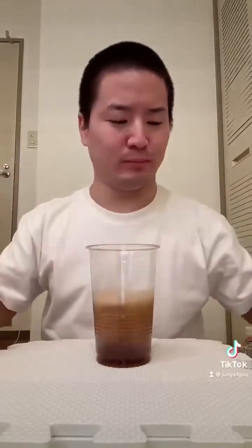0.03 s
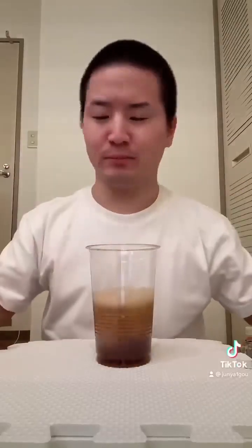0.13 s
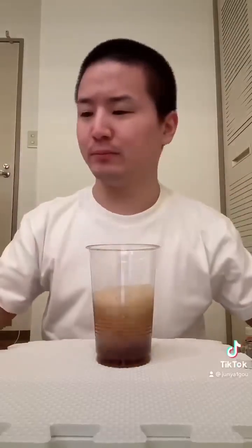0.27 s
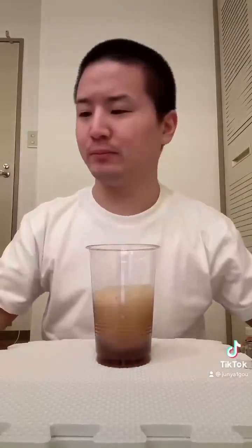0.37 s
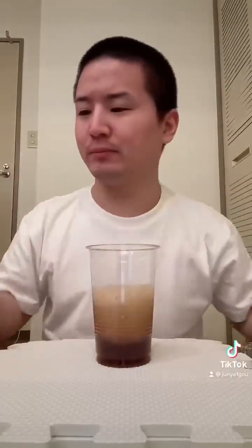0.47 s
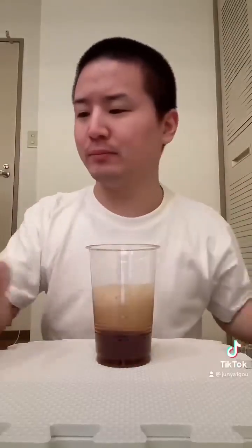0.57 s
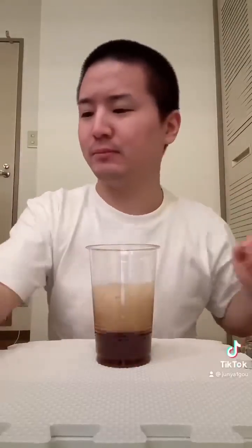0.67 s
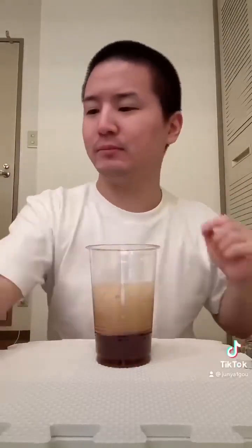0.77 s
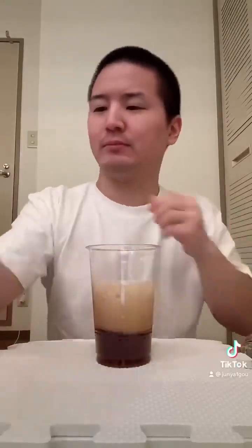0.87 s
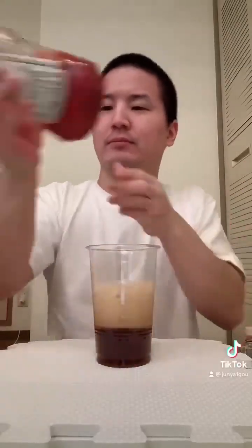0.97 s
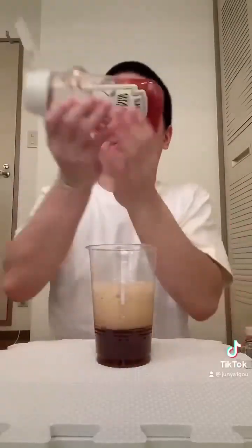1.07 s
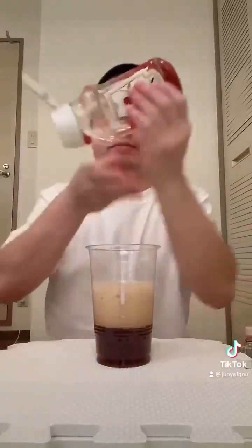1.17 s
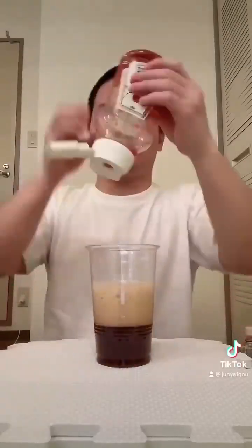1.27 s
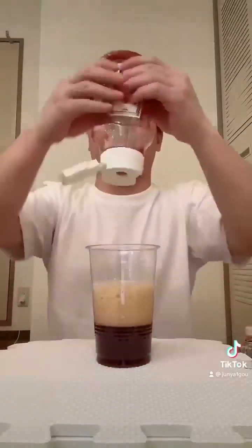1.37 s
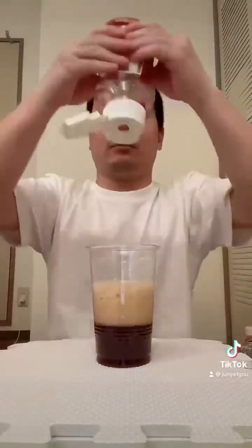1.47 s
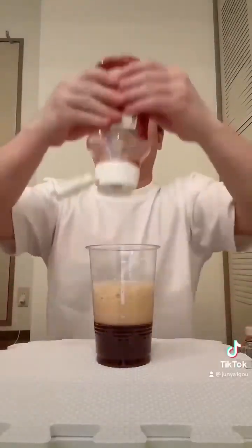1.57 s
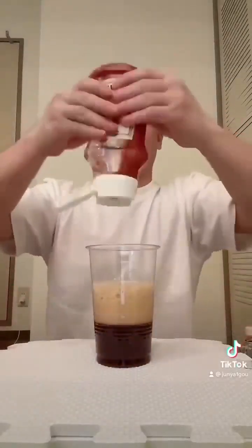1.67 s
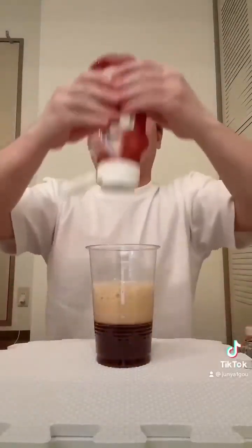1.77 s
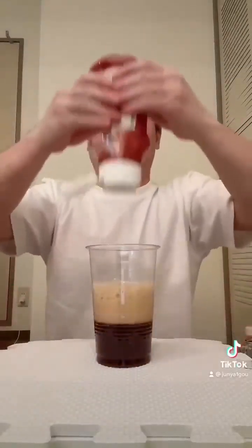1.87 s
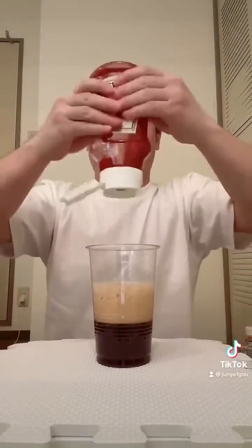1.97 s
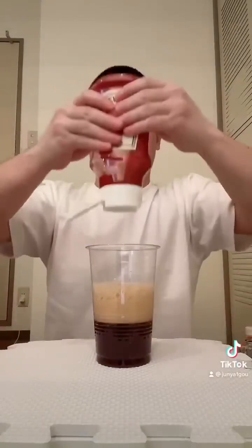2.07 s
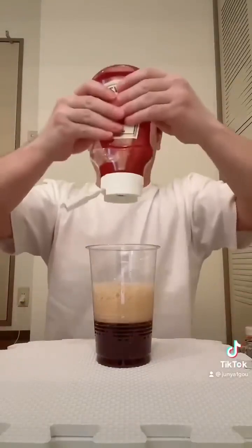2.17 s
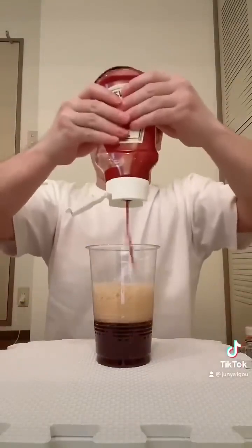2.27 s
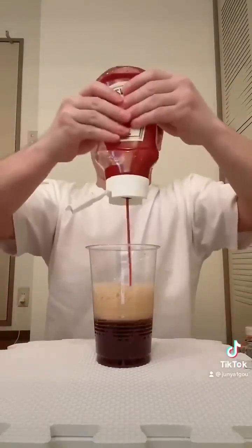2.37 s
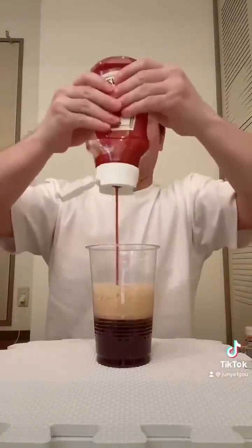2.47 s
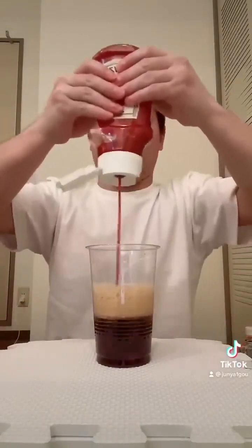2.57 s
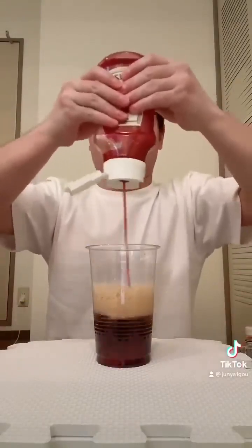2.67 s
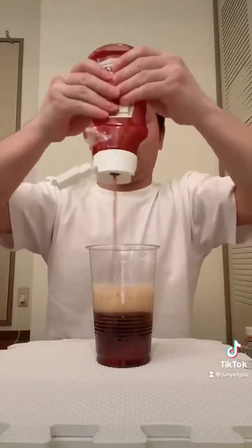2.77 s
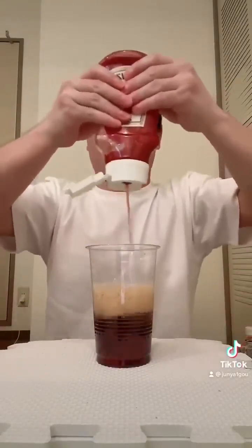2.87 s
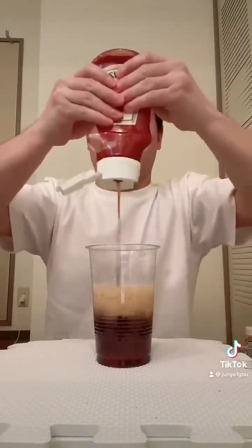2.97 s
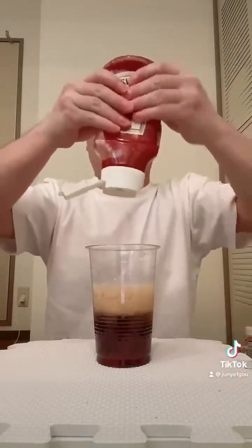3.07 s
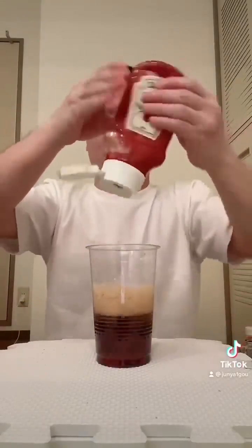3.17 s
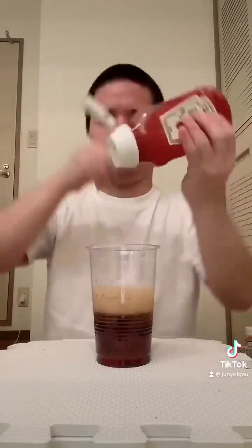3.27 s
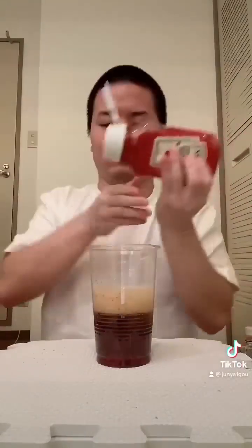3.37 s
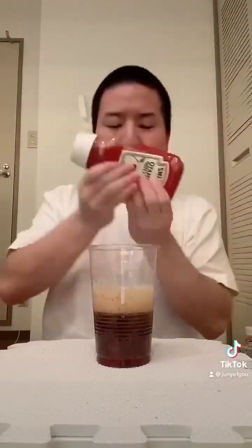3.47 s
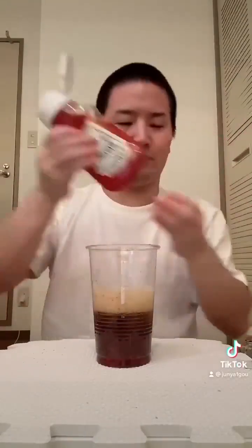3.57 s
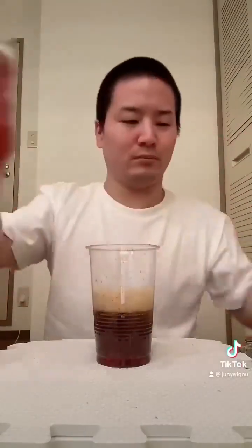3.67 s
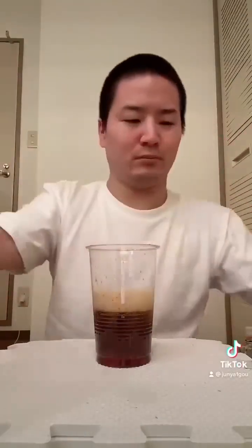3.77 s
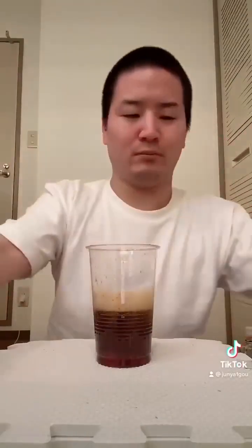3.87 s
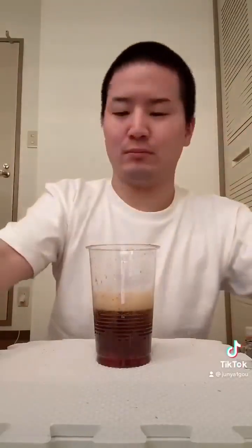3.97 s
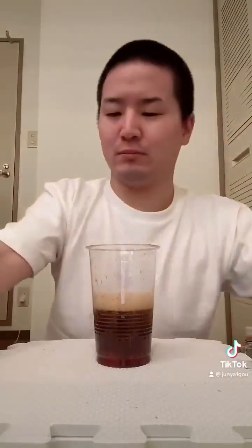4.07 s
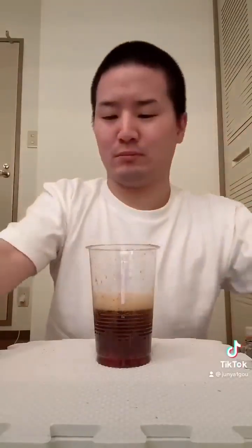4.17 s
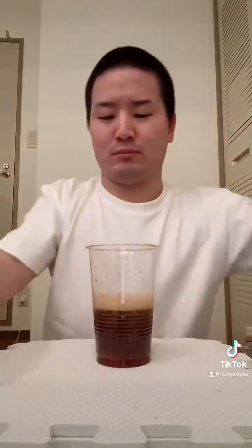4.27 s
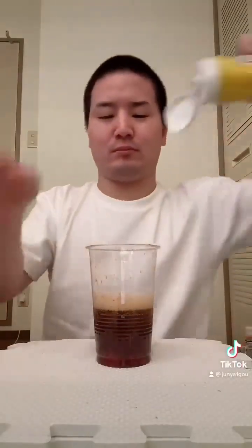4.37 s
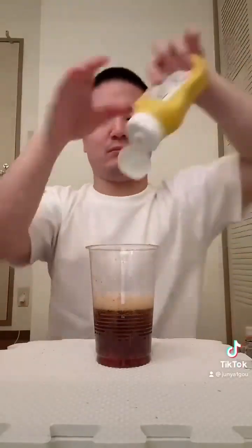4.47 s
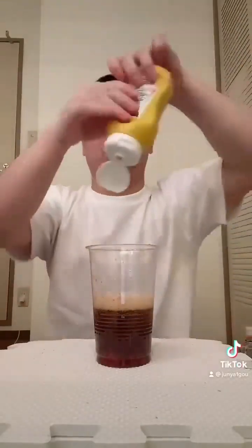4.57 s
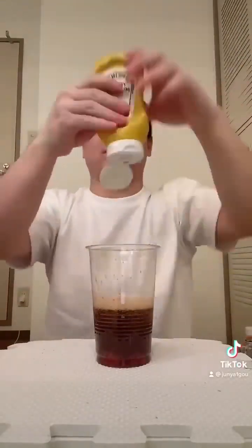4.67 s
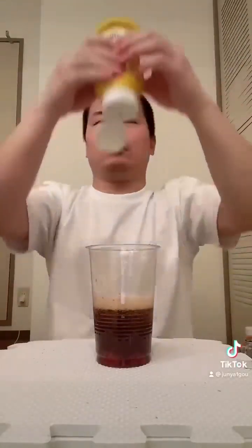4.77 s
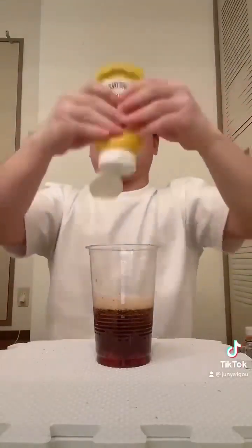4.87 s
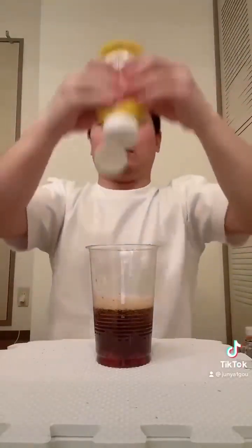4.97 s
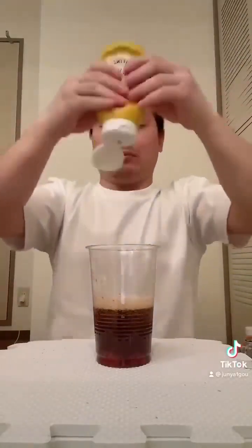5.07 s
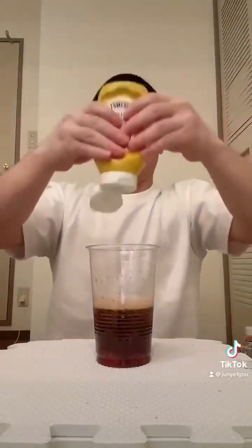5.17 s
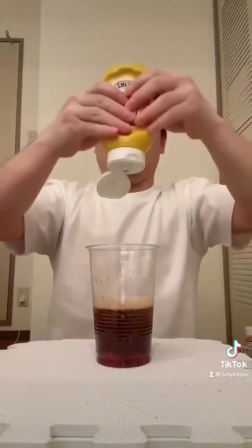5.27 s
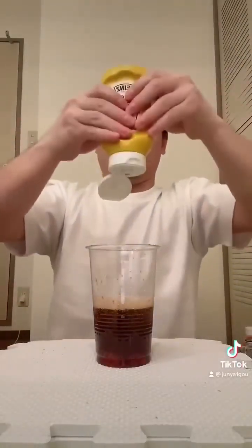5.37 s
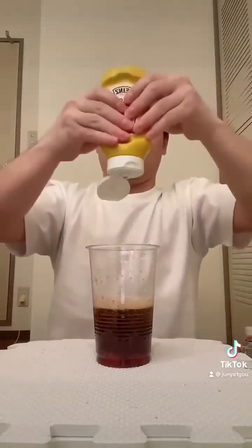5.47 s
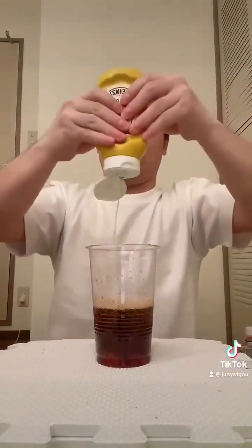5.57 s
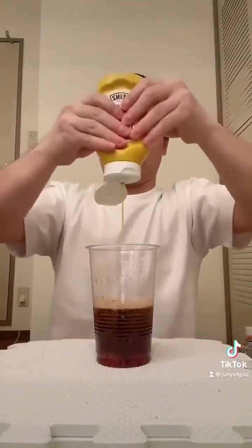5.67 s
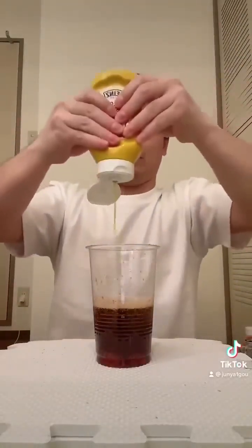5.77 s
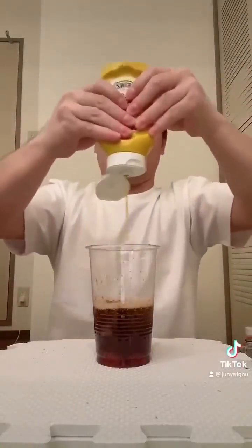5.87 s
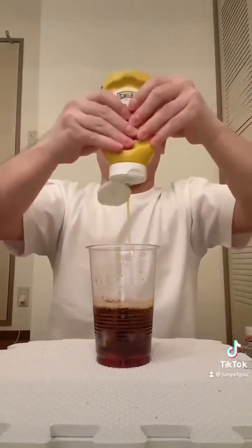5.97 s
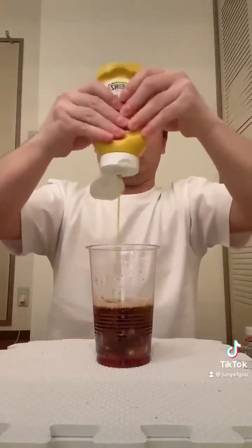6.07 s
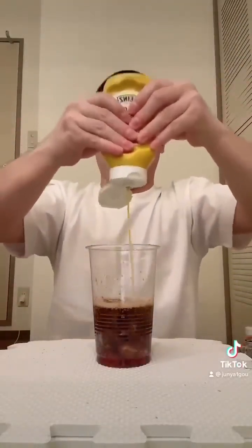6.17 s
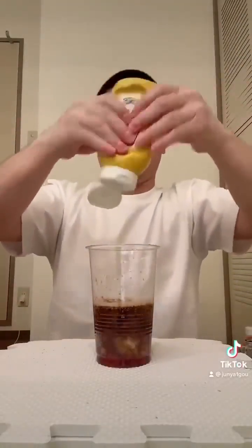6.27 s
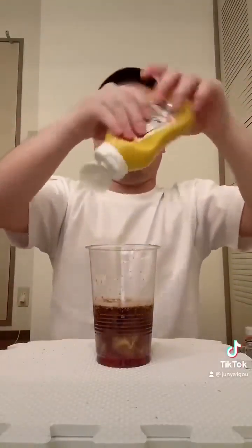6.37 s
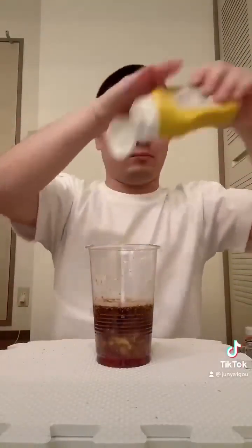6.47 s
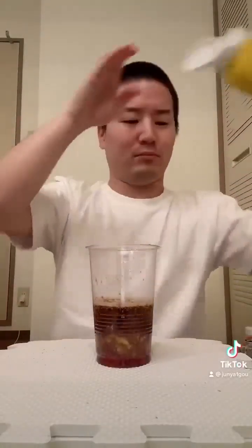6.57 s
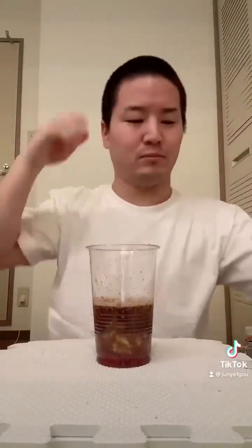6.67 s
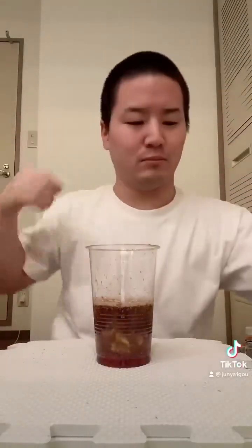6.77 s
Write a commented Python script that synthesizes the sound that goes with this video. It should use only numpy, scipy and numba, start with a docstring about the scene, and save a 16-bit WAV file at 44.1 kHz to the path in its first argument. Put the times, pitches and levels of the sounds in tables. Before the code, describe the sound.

A hard table knock, sputtering ketchup squirts, a bottle clacking down and rattling still, then a rude mustard blast thinning to spits over fizz.

```python
"""Two plastic sauce bottles are squeezed into a cup of fizzing soda on a table in a small room.
Each nozzle sputters as a stream of tiny pops over hiss, filtered by the sauce pocket and the cap;
the second bottle thins to single spits, made of noise puffs, and short hisses are bands of noise.
Bottles knock on the table as ringing modes with a plastic rattle, and the first one rocks to rest.
The fizz is a dense scatter of clicks over hiss, with two foam notes, a low rumble and airy noise."""
import sys
import numpy as np
from scipy import signal
from scipy.fft import rfft, irfft, next_fast_len
from scipy.io import wavfile
from scipy.ndimage import map_coordinates
from numba import njit

SR = 44100
rng = np.random.default_rng(int(sys.argv[2]) if len(sys.argv) > 2 else 0)


def waveform_to_disk(signal):
    """Save audio, clipped to [-1, 1], as 16-bit WAV at the path in sys.argv[1]."""
    frames = np.transpose(np.atleast_2d(signal))
    scaled = np.clip(frames, -1, 1) * 32767
    samples = np.round(scaled).astype(np.int16)
    wavfile.write(sys.argv[1], SR, samples)


N = 300321

# FIZZ AND ROOM: spectra before each layer is set to its own level: (frequency [Hz], density [dB per Hz])
FIZZ_SPECTRUM = [(1060, -25.5), (1800, -7), (2320, -8.5), (3770, -5), (4640, -5.5), (5160, -4), (6890, -5),
                 (7400, -6), (9110, -8), (10100, -12.5), (13100, -13), (15500, -18)]
RUMBLE_SPECTRUM = [(20, -33), (45, -21), (65, -21.5), (85, 4), (120, -5.5), (170, -9), (250, -22),
                   (500, -56.5)]
AIR_SPECTRUM = [(120, -28.5), (250, -6.5), (380, 2), (520, -1.5), (700, -3), (1050, -8), (1600, -12.5),
                (2400, -24.5), (5000, -29)]
# the foam and the air above it resonate, each note swelling once:
# (frequency [Hz], half-width at about -6 dB [Hz], resting level [dB],
#  peak time [s], rise [s], fall [s], swell [dB])
FOAM_NOTES = [(1260, 280, -65.5, 4.03, 1.1, 0.75, 14), (1790, 190, -69.5, 3.12, 2.4, 1.0, 13)]
# resting level [dB], then one swell: (peak time [s], rise [s], fall [s], gain [dB])
# the fizz slowly swells, then sinks at the end; rumble and air swell too
FIZZ_DB, FIZZ_SWELL = -60, (5.95, 3.5, 1.02, 10.1)
RUMBLE_DB, RUMBLE_SWELL = -60, (4.54, 1.42, 9.1, 10.8)
AIR_DB, AIR_SWELL = -62.5, (5.2, 2.6, 6, 11.25)
# the treble of the fizz, above FINE_HZ, has a late swell of its own; level against the rest of the fizz
FINE_HZ, FINE_DB, FINE_SWELL = 8000, -1.5, (6.06, .9, 1.0, 6.7)
# decay of the room's tail: (frequency [Hz], t60 [s])
ROOM_DECAY = [(150, 0.28), (350, 0.32), (1000, 0.2), (3000, 0.25), (10000, 0.17)]
TOP_HZ = 15850  # nothing passes above this

# blows on the table, before a common trim: (time [s], body level [dB],
#  softness: loss in each higher register [dB], thump against the body [dB])
KNOCKS = [(0.165, -5, 10.5, -10), (0.18, -17, 20, 1), (0.239, -22, 6.5, 7.5), (0.247, -21.5, 10, 13),
          (0.283, -35, 11, 12), (0.682, -39, 3.5, -5), (0.707, -38, 5, -1.5), (1.065, -47, .8, -1),
          (1.097, -41.5, 4.5, 0), (1.127, -50.5, 2, 7), (1.376, -49.5, 2, 1), (3.108, -39.5, 5, -8),
          (3.453, -45, 6, 3.5), (3.486, -39.5, 10, 4), (3.977, -27, 10.3, -5), (6.264, -40, 8, -16),
          (6.361, -40, 5, -9), (6.431, -35.5, 3, -7)]
# the full bottle is put down hard, before a trim: (time [s], reference level [dB],
#  then thump, body, clack and tick against it [dB])
LANDING = [(3.909, 2.25, -15, -14.5, -11, -19)]
# ringing modes, before random strength, detuning and damping: (frequency [Hz], level [dB], t60 [s])
TABLE_MODES = [(123, -3, .057), (183, -0.5, .067), (312, -3.5, 0.063), (369, 1, .07), (449, 2.5, .07),
               (521, -.5, .074), (610, -3.5, 0.046), (785, 3.5, .055), (860, -14, .022), (960, -22.5, .069),
               (1050, -5.5, .034), (1430, -9.5, .04), (1700, -4.5, 0.046), (1998, 3, .052),
               (2330, -18.5, .071), (3360, -44.5, .03)]
BOTTLE_MODES = [(157, -2.5, 0.13), (261, 5, 0.057), (335, 7, 0.065), (438, 2, 0.075), (653, 0, 0.052),
                (796, -3.5, 0.097), (1350, -13.5, 0.12), (1426, -18.5, 0.36), (1740, 3.5, 0.053),
                (1900, 3, 0.033), (2015, 3, 0.037), (2545, -1, 0.034), (2730, -13, 0.078),
                (3470, -29, 0.076), (3730, -8, 0.025), (4190, -7, 0.018)]
# registers of a knock, thump to tick: (low edge [Hz], high edge [Hz])
KNOCK_BANDS = [(80, 300), (300, 1100), (1100, 3000), (3000, 15000)]
# the weight of the landing bottle gives the table one low push: scale [dB], time constant [s]
PUSH_DB, PUSH_S = -27, .003

# the upturned bottle is shaken, the valve clicks and the sauce slumps; clicks are before the puff trim:
# (time [s], click level [dB], plop level [dB], plop delay [s], plop pitch [ratio])
SHAKES = [(1.659, -37.5, -17, 0.0021, 1.5), (4.687, -29.5, -26, 0.0023, 0.95),
          (4.999, -26.5, -2, .011, 1.017)]
# sauce slumping into the neck, before the plop's pitch and level: (frequency [Hz], level [dB], t60 [s])
PLOP_MODES = [(407, -18.5, 0.041), (531, -17.5, 0.034), (693, -24, 0.056), (946, -16.5, 0.013),
              (1220, -35, 0.025), (1670, -33, 0.036)]
# register balance of the click against its level: (gurgle [dB], rasp [dB], spray [dB])
CLICK_BALANCE = (-8, -9.5, 0.5)
# the wet slap that comes with a plop, against its level: (gurgle [dB], rasp [dB], spray [dB])
SPLAT_BALANCE = (-25, -28, -34)

# sputtering squeezes: (start [s], hold [s], gurgle level [dB], rasp level [dB], spray level [dB],
#  sag [dB/s], further sag of gurgle and rasp [dB/s], pops [per s])
SQUEEZES = [(2.239, .072, -26.5, -25.5, -24.5, 9, 25, 377),
            (2.576, 0.4135, -34.5, -28.3, -22.5, 3.5, -2.5, 390),
            (5.495, 0.073, -12, -11.5, -22, 135, 17, 900), (5.575, .65, -34.5, -28, -40, 21.5, 49, 640)]
# lumps of sauce reach the valve and make the jet wetter:
# (peak time [s], rise [s], fall [s], gain of the gurgle [dB])
LUMPS = [(2.272, .025, .016, 4), (2.742, .045, .135, 14), (2.95, .022, .045, 8.5)]
LUMP_RASP_SHARE = 0.73  # the rasp follows the gurgle in part
LUMP_POPS_PER_DB = 0.3  # the film bursts faster: fraction of the pop rate added per dB
# gurgle, rasp and spray registers of a nozzle: (low edge [Hz], high edge [Hz])
NOZZLE_BANDS = [(300, 1500), (1500, 4500), (4500, 16500)]
# spray colour of the short ketchup squeeze, the long one and the mustard, before the registers are
# balanced: (frequency [Hz], density [dB per Hz])
KETCHUP_SHORT_SPRAY = [(180, -80), (300, -33), (652, -5), (808, -11.5), (1050, -2), (1330, -10),
                       (1810, -10), (2140, -13), (3020, -5.5), (3750, -19.5), (4960, -21), (10800, -34.5),
                       (15500, -35)]
KETCHUP_SPRAY = [(88, -62), (150, 2.5), (296, -16), (490, -3), (695, -4), (1240, -1.5), (1570, -10.5),
                 (2270, -10), (2650, -6.5), (4060, -10), (6350, -9.5), (11400, -21.5), (15500, -16)]
MUSTARD_SPRAY = [(180, -60), (300, -36.5), (696, -12.5), (922, -7), (1280, -6.5), (1560, -15),
                 (1840, -11.5), (2250, -16), (2930, -13), (4490, -22), (6360, -11.5), (8010, -16.5),
                 (15500, -21)]
# cavity resonances of each bottle and cap: (frequency [Hz], width [Hz], lift [dB])
KETCHUP_CAP = [(930, 39, 7), (1030, 23, 4.5), (1220, 150, 4.5), (1890, 270, 4), (2660, 72, -4),
               (2664, 203, 7), (3015, 55, 6), (3220, 27, 1.5), (3420, 21, 9), (4340, 370, -4.5),
               (4250, 49, 3), (4430, 260, 6.5), (6330, 420, 5.5), (7530, 380, 5), (7720, 250, -3.5),
               (8800, 220, 9)]
MUSTARD_CAP = [(937, 38, 3.8), (1080, 23, 0.5), (1260, 96, 6), (1750, 240, 3.3), (2990, 220, 2.9),
               (5000, 340, 8.3), (6330, 1440, 6.9), (7530, 240, 10.5), (8000, 250, 1), (9100, 1900, 9.9)]
# the pocket of sauce at the valve rings higher as it empties:
# (full pitch [Hz], empty pitch [Hz], half-empty time [s], emptying time [s], lift [dB])
SHORT_POCKET = (650, 4300, 2.291, .009, 10)
LONG_POCKET = (1220, 1260, 8, 3, -20)
MUSTARD_POCKET = (893, 6260, 5.767, 0.06, 1.8)
ATTACK_S, RELEASE_DB_PER_S = 0.0012, 720  # the valve snaps open and closes more slowly
OPENING_DB, OPENING_S = 1, 0.0047  # the stored pressure overshoots as the valve opens, then decays
SPRAY_LEAD_S = .012  # fine spray needs the most pressure and stops this much sooner

# short hisses of air through the valve, from narrow to broad noise:
# (time [s], length [s], frequency [Hz], half-width at about -6 dB [Hz], level [dB])
VALVE_HISSES = [(2.384, 0.057, 8200, 900, -51), (5.477, 0.03, 8800, 1510, -39),
                (5.674, 0.038, 12300, 3010, -39), (6.076, .06, 11300, 4500, -40.5),
                (6.238, 0.052, 6940, 6950, -43), (6.233, 0.062, 3020, 600, -45)]

# the bottle rolls on its rim after landing, and its note sinks; level before the soft filter
ROLL_START_S, ROLL_LENGTH_S, ROLL_HZ, ROLL_SINK_OCTAVES_PER_S, ROLL_DB = 3.95, .3, 394, 6.4, -40.5
# it tips from edge to edge: first tap, basic gap, each gap over the last, unevenness of the two edges
ROCK_START_S, ROCK_GAP_S, ROCK_SHRINK, ROCK_LIMP = 4.128, .091, .954, .05
ROCK_DB, ROCK_FADE_DB = -27, 6.5  # first taps before the soft filter, and the loss by the last one

# single bubbles burst in the mustard nozzle, before the puff trim:
# (time [s], spray level [dB], extra gurgle of the sauce carried along [dB])
SPITS = [(5.589, -20, 8), (5.605, -23, 0), (5.623, -25.5, -1), (5.641, -20.5, 0), (5.659, -21, 3),
         (5.676, -21.5, 1), (5.7, -18.5, -7), (5.725, -15.5, -2), (5.75, -20, -13), (5.777, -20.5, -11),
         (5.823, -18, 0.5), (5.848, -20, -0.5), (5.89, -21.5, 0), (5.926, -19, 0.5), (5.981, -24, -7),
         (6.026, -34, 0), (6.244, -37, 2)]
# a spit dries as the pocket empties; balance against the spray: (gurgle [dB], rasp [dB])
WET_SPIT_BALANCE = (8, 9.5)
DRY_SPIT_BALANCE = (-18, -11)


def amp(db):
    """Decibels to gain."""
    return 10 ** (np.asarray(db) / 20)


def unit(x):
    """Scaled to rms 1."""
    return x / np.sqrt(np.mean(x ** 2) + 1e-20)


def along(points, hz):
    """(frequency, value) points read on a log-frequency axis."""
    f, v = np.transpose(points)
    return np.interp(np.log(hz + 1), np.log(f + 1), v)


def add(track, s, sound):
    """Mixes a sound into the track at time s."""
    part = track[max(round(s * SR), 0):][:len(sound)]
    part += sound[:len(part)]


def swell(t, peak_s, rise_s, fall_s, gain_db):
    """A bell-shaped rise and fall in dB."""
    side_s = np.where(t < peak_s, rise_s, fall_s)
    return gain_db * np.exp(-((t - peak_s) / side_s) ** 2)


def wobble(size, per_s):
    """A smooth random curve with per_s knots a second."""
    knots = rng.standard_normal(int(size * per_s / SR) + 4)
    return map_coordinates(knots, [np.arange(size) * per_s / SR])


def coloured(x, gain_db):
    """x through the causal minimum-phase filter with the given dB-of-frequency law."""
    size = 2 * next_fast_len(len(x) // 2 + 4096)
    cepstrum = irfft(np.log(amp(gain_db(np.fft.rfftfreq(size, 1 / SR))) + 1e-6))
    # folding the cepstrum forward in time makes the filter causal
    cepstrum[1:size // 2] *= 2
    cepstrum[size // 2 + 1:] = 0
    return irfft(rfft(x, size) * np.exp(rfft(cepstrum)))[:len(x)]


def band(x, edges):
    """Causal band-pass."""
    return signal.sosfilt(signal.butter(3, edges, 'bandpass', fs=SR, output='sos'), x)


def resonant_noise(size, hz, width_hz):
    """Noise of rms 1 in one steep-sided resonance."""
    def resonance_db(f):
        return -20 * np.log10(1 + ((f - hz) / width_hz * 1.01) ** 2)
    return unit(coloured(rng.standard_normal(size), resonance_db))


@njit
def resonate(x, omega, sharpness):
    """A resonance of unit gain that follows omega (radians per sample)."""
    out = np.zeros(len(x))
    speed, place = 0.0, 0.0
    for i in range(len(x)):
        g = np.tan(omega[i] / 2)
        v = (speed + g * (x[i] - place)) / (1 + g * (g + 1 / sharpness))
        speed, place = 2 * v - speed, place + 2 * g * v
        out[i] = v / sharpness
    return out


def balanced(x, bands, levels_db):
    """A short sound with each register set to its level over the first 30 ms."""
    parts = [band(x, edges) for edges in bands]
    head = round(.03 * SR)
    return sum(amp(db) * p / np.sqrt(np.mean(p[:head] ** 2)) for p, db in zip(parts, levels_db))


def soda_and_room(bubbles_per_s, spread_db, hiss_db):
    """Countless bubbles burst in the foam, which resonates in two bands; the room adds rumble and air."""
    t = np.arange(N) / SR
    happens = rng.random(N) < bubbles_per_s / SR
    signs = rng.choice([-1, 1], N)
    sizes = amp(spread_db * np.minimum(rng.exponential(size=N), 5))
    bursts = unit(happens * signs * sizes)
    hiss = amp(hiss_db) * rng.standard_normal(N)
    fizz = unit(coloured(bursts + hiss, lambda f: along(FIZZ_SPECTRUM, f)))
    fine = signal.sosfiltfilt(signal.butter(2, FINE_HZ, 'highpass', fs=SR, output='sos'), fizz)
    fizz = fizz - fine + amp(FINE_DB + swell(t, *FINE_SWELL)) * fine
    notes = sum(amp(db + swell(t, *shape)) * resonant_noise(N, hz, width_hz)
                for hz, width_hz, db, *shape in FOAM_NOTES)
    notes = notes * amp(0.89 * wobble(N, 5.2))  # the notes waver in level at random
    rumble = unit(coloured(rng.standard_normal(N), lambda f: along(RUMBLE_SPECTRUM, f)))
    air = unit(coloured(rng.standard_normal(N), lambda f: along(AIR_SPECTRUM, f)))
    fizz = amp(FIZZ_DB + swell(t, *FIZZ_SWELL)) * fizz
    rumble = amp(RUMBLE_DB + swell(t, *RUMBLE_SWELL)) * rumble
    air = amp(AIR_DB + swell(t, *AIR_SWELL)) * air
    return fizz + notes + rumble + air


def blow(modes, levels_db, damping, rattle_db, rattle_t60):
    """One contact: the modes ring, with a crack and a brief dense rattle of plastic."""
    t = np.arange(SR // 3) / SR
    hz, db, t60 = np.transpose(modes)[:, :, None]
    strength_db, detune, phase = rng.standard_normal((3, len(modes), 1))
    decay = amp(db + 1.8 * strength_db - 60 * t * damping / t60)
    ring = np.sum(decay * np.sin(2 * np.pi * hz * (1 + .003 * detune) * t + np.pi * phase), axis=0)
    ring = ring * (1 - np.exp(-t / 0.00064))  # soft onset
    crack = amp(11.5 - 60 * t / 0.003)
    rattle = amp(rattle_db - 60 * t / rattle_t60)
    clatter = rng.standard_normal(len(t)) * (crack + rattle)
    plastic = [(500, 5), (2000, 5), (3800, -4.5), (6000, -16.5), (12000, -27.5)]  # (Hz, dB)
    clatter = coloured(clatter, lambda f: along(plastic, f))
    return balanced(ring + clatter, KNOCK_BANDS, levels_db)


def knocks():
    """Bottles and hands meet the table; soft contacts thump, hard ones clack."""
    out = np.zeros(N)
    for s, body_db, softness_db, thump_db in KNOCKS:
        levels_db = body_db + np.array([thump_db, 0, -softness_db, -2 * softness_db])
        knock = blow(TABLE_MODES, levels_db, damping=1.1, rattle_db=1.3, rattle_t60=0.096)
        add(out, s + .002, amp(-7) * knock)
    for s, level_db, *shares_db in LANDING:
        levels_db = np.add(level_db, shares_db)
        landing = blow(BOTTLE_MODES, levels_db, damping=1.08, rattle_db=-7.0, rattle_t60=0.073)
        add(out, s + 0.0034, amp(-4.5) * landing)
        u = np.arange(SR // 10) / SR / PUSH_S
        add(out, s + 0.0034, amp(PUSH_DB) * u * (2 - u) * np.exp(-u))
    return out


def emptiness(t, pocket):
    """How far the sauce pocket has emptied, from 0 to 1."""
    half_s, emptying_s = pocket[2:4]
    return .5 + .5 * np.tanh((t - half_s) / (2 * emptying_s))


def nozzle(x, start, spray, cap, pocket):
    """Sound leaving the valve: the moving sauce pocket, the fixed cavities, the spray's spectrum."""
    full_hz, empty_hz, *_, lift_db = pocket
    pocket_hz = full_hz * (empty_hz / full_hz) ** emptiness(start + np.arange(len(x)) / SR, pocket)
    x = x + amp(lift_db) * resonate(x, 2 * np.pi * pocket_hz / SR, 7.8)

    def colour_db(f):
        cavities_db = sum(db / (1 + (2 * (f - hz) / width) ** 2) for hz, width, db in cap)
        return along(spray, f) + cavities_db
    return coloured(x, colour_db)


def puff(s, levels_db):
    """A trapped bubble leaves the nozzle in a few milliseconds, with a faint tail."""
    t = np.arange(SR // 25) / SR
    rise = t / .0014
    envelope = rise * np.exp(-rise ** 2 / 2) + amp(-25 - 60 * t / .04)
    noise = envelope * rng.standard_normal(len(t))
    burst = nozzle(noise, s, MUSTARD_SPRAY, MUSTARD_CAP, MUSTARD_POCKET)
    return amp(-13) * balanced(burst, NOZZLE_BANDS, levels_db)


def shakes():
    """The valve clicks, then the sauce slaps against the cap and briefly rings the air in the bottle."""
    out = np.zeros(N)
    t = np.arange(SR // 8) / SR
    for s, click_db, plop_db, delay_s, pitch in SHAKES:
        add(out, s, puff(s, np.add(click_db, CLICK_BALANCE)))
        ring = sum(amp(db - 60 * t / t60) * np.sin(2 * np.pi * (pitch * hz * t + rng.random()))
                   for hz, db, t60 in PLOP_MODES)
        add(out, s + delay_s, amp(plop_db) * ring * (1 - np.exp(-t / 0.00072)))
        add(out, s + delay_s, puff(s, np.add(plop_db, SPLAT_BALANCE)))
    return out


def sputter(squeeze, spray, cap, pocket, flutter_db, hiss_db, scatter_db):
    """The sauce film bursts again and again at uneven intervals, over a hiss of escaping air."""
    start, hold_s, gurgle_db, rasp_db, spray_db, sag, drying, pops_per_s = squeeze
    t = np.arange(0, hold_s + .1, 1 / SR)
    lump_db = sum(swell(start + t, *lump) for lump in LUMPS)
    pressure = (1 - np.exp(-t / ATTACK_S)) * amp(OPENING_DB * np.exp(-t / OPENING_S) - sag * t)
    gurgle_db = gurgle_db + lump_db - drying * t
    rasp_db = rasp_db + LUMP_RASP_SHARE * lump_db - drying * t
    rate = pops_per_s * (1 + LUMP_POPS_PER_DB * lump_db)
    # pops fall due at uneven counts of the running pop rate
    turns = np.cumsum(rng.gamma(2, 1 / 2, 1000))
    sizes = amp(scatter_db * np.clip(rng.standard_normal(len(turns)), -2, 1.4))
    sizes[0] = amp(scatter_db)  # the opening pop has a set size
    at = np.searchsorted(np.cumsum(rate) / SR, turns - turns[0])
    pops = -np.bincount(at, sizes, len(t) + 1)[:len(t)] / np.sqrt(rate)
    hiss = amp(hiss_db) * rng.standard_normal(len(t))
    jet = nozzle(unit(pops) + hiss, start, spray, cap, pocket)
    # the finest spray flutters in level at random
    mist = band(jet, (9500, 16500))
    jet = jet + mist * (amp(2.5 * wobble(len(t), 35)) - 1)
    out = np.zeros(N)
    levels_db = gurgle_db, rasp_db, spray_db
    stops_s = hold_s, hold_s, hold_s - SPRAY_LEAD_S
    for edges, db, stop_s in zip(NOZZLE_BANDS, levels_db, stops_s):
        release = amp(-RELEASE_DB_PER_S * np.maximum(t - stop_s, 0))
        part = band(jet, edges) * amp(flutter_db * wobble(len(t), 60))
        part = part / np.std(part[t < hold_s])
        add(out, start, pressure * release * amp(db) * part)
    return out


def squeezes():
    """A short and a long ketchup squeeze, then a mustard blast that thins to a leak."""
    short, long, blast, leak = SQUEEZES
    first = sputter(short, KETCHUP_SHORT_SPRAY, KETCHUP_CAP, SHORT_POCKET,
                    flutter_db=.8, hiss_db=-5, scatter_db=4)
    second = sputter(long, KETCHUP_SPRAY, KETCHUP_CAP, LONG_POCKET,
                     flutter_db=1.2, hiss_db=-5.5, scatter_db=3.8)
    third = sputter(blast, MUSTARD_SPRAY, MUSTARD_CAP, MUSTARD_POCKET,
                    flutter_db=1.7, hiss_db=0, scatter_db=-0.5)
    fourth = sputter(leak, MUSTARD_SPRAY, MUSTARD_CAP, MUSTARD_POCKET,
                     flutter_db=2, hiss_db=1, scatter_db=3.5)
    return first + second + third + fourth


def valve_hisses():
    """Air slips through the nearly closed valve in short hisses, from narrow to broad noise."""
    out = np.zeros(N)
    for s, length_s, hz, width_hz, db in VALVE_HISSES:
        size = round(length_s * SR)
        add(out, s, amp(db) * signal.windows.tukey(size, .5) * resonant_noise(size, hz, width_hz))
    return out


def rocking(count):
    """The bottle rolls briefly on its rim, then taps ever closer together, the last taps lighter."""
    out = np.zeros(N)
    t = np.arange(0, ROLL_LENGTH_S, 1 / SR)
    omega = 2 * np.pi * ROLL_HZ * 2 ** (-ROLL_SINK_OCTAVES_PER_S * t) / SR
    roll = resonate(rng.standard_normal(len(t)), omega, 1.7)
    roll = unit(resonate(roll, omega, 1.7))
    roll_db = ROLL_DB - 19.5 + swell(t, .105, .14, 0.14, gain_db=19.5)
    add(out, ROLL_START_S, amp(roll_db) * roll)
    s = ROCK_START_S
    for k in range(count):
        db = ROCK_DB - ROCK_FADE_DB * (k / (count - 1)) ** 5
        levels_db = db + np.array([-42, -14.5, -21.0, -26.5])
        add(out, s, blow(TABLE_MODES, levels_db, damping=0.73, rattle_db=0.0, rattle_t60=0.078))
        s += ROCK_GAP_S * ROCK_SHRINK ** k * (1 + ROCK_LIMP * (-1) ** k)
    soft = [(300, -1), (430, -1), (780, -5.5), (1500, -6.5)]  # (Hz, dB)
    return coloured(out, lambda f: along(soft, f))


def spits():
    """Single puffs, wet and low at first, dry and bright once the pocket is empty."""
    out = np.zeros(N)
    for s, db, sauce_db in SPITS:
        dryness = emptiness(s, MUSTARD_POCKET)
        balance = (1 - dryness) * np.array(WET_SPIT_BALANCE) + dryness * np.array(DRY_SPIT_BALANCE)
        gurgle_db, rasp_db = balance
        add(out, s, puff(s, [db + gurgle_db + sauce_db, db + rasp_db, db]))
    return out


def room(x, early_db, tail_db):
    """The direct sound, a few echoes off table and near walls, and a tail that keeps its bass longest."""
    hz, t, z = signal.stft(rng.standard_normal(SR // 2), SR, nperseg=256)
    decay = amp(-60 * t / along(ROOM_DECAY, hz)[:, None])
    tail = signal.istft(z * decay, SR, nperseg=256)[1]
    response = amp(tail_db) * tail / np.linalg.norm(tail)
    for delay_s, db in [(.0021, -10), (.0058, -0.5), (.0097, -7.5), (.0165, -3)]:
        response[round(delay_s * SR)] += amp(early_db + db)
    return x + signal.fftconvolve(x, response)[:N]


def scene():
    """Table sounds and nozzle sounds in the room, over the fizz."""
    table = room(knocks() + rocking(count=13), early_db=-17, tail_db=-16.0)
    bottles = room(squeezes() + spits() + shakes() + valve_hisses(), early_db=-17, tail_db=-13)
    soda = soda_and_room(bubbles_per_s=2200, spread_db=1.0, hiss_db=1.0)
    return (table + bottles + soda)[None]


def record(dry):
    """Peaks are rounded off at full scale; nothing passes above the band limit."""
    limited = dry / (1 + np.abs(dry) ** 16) ** (1 / 16)
    return irfft(rfft(limited) * (np.fft.rfftfreq(N, 1 / SR) < TOP_HZ), N)


dry = scene()
out = record(dry)
waveform_to_disk(out)
```